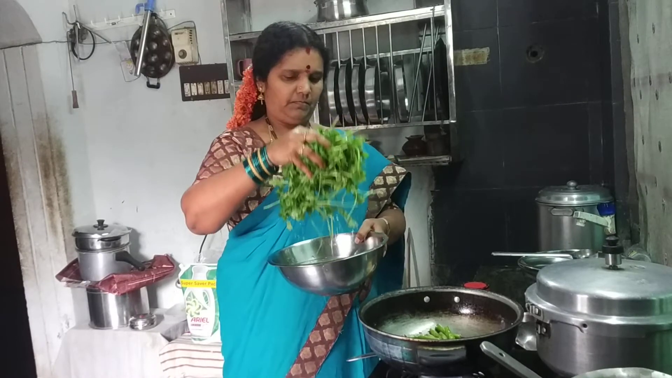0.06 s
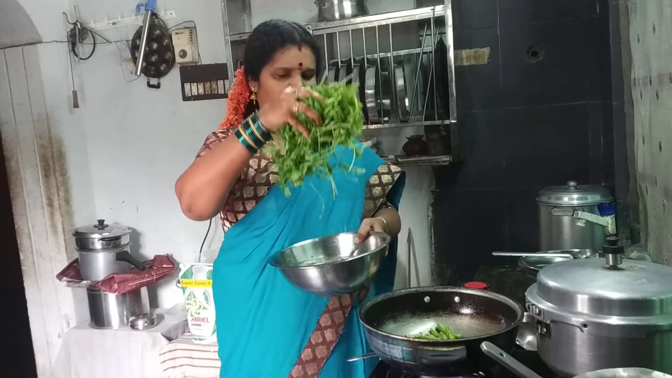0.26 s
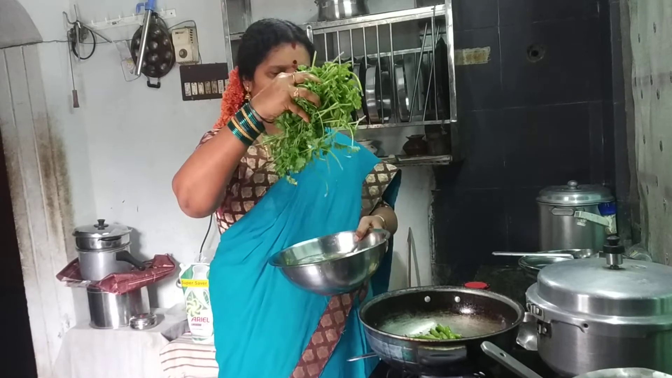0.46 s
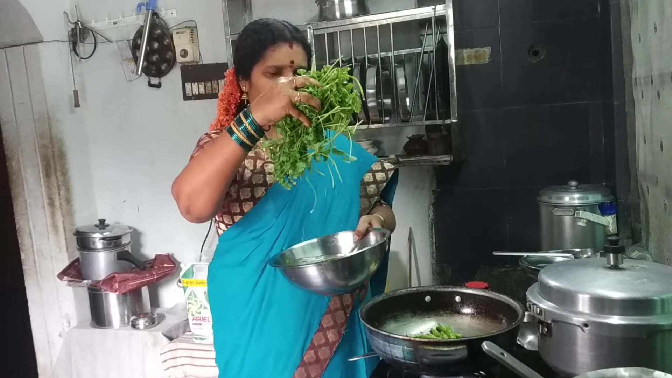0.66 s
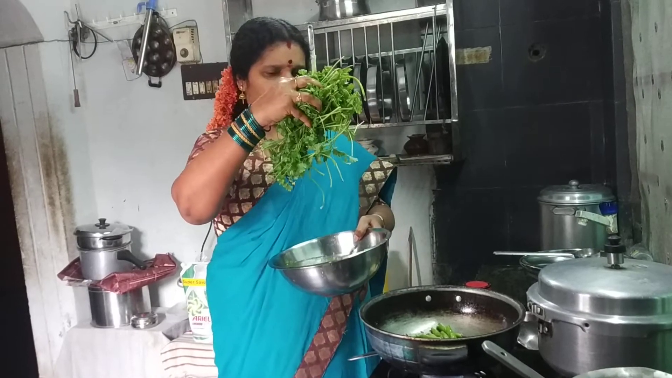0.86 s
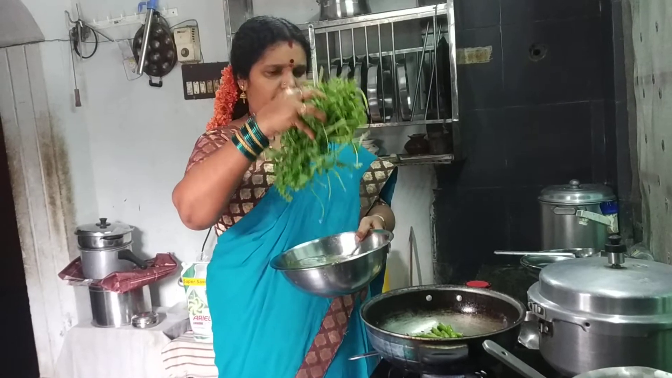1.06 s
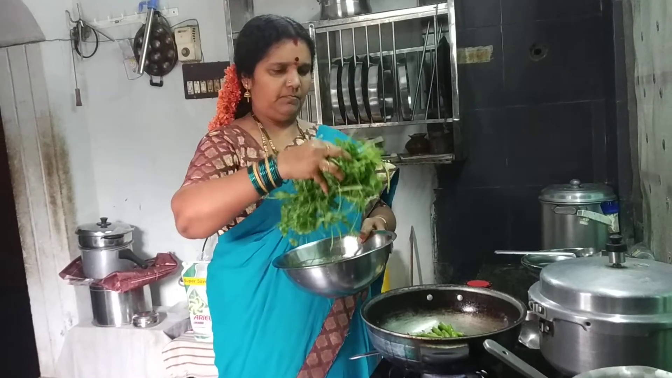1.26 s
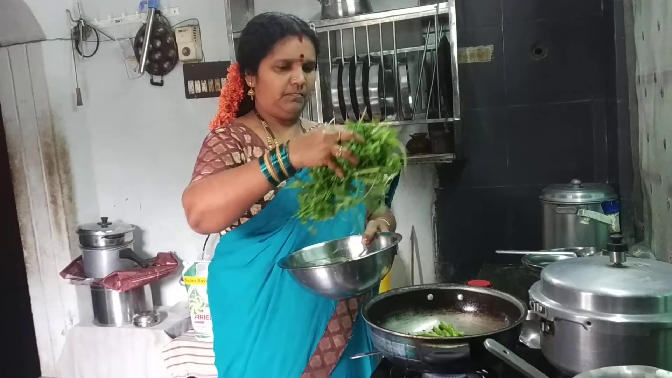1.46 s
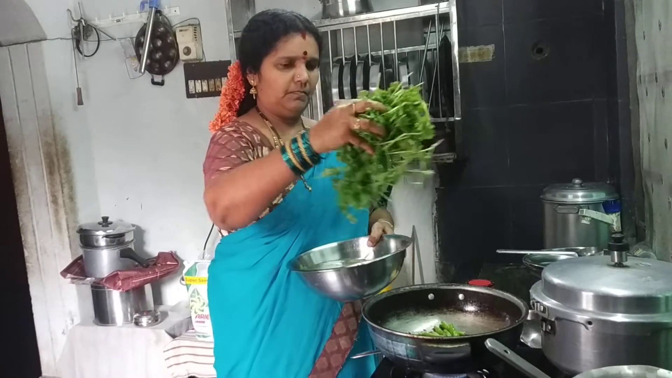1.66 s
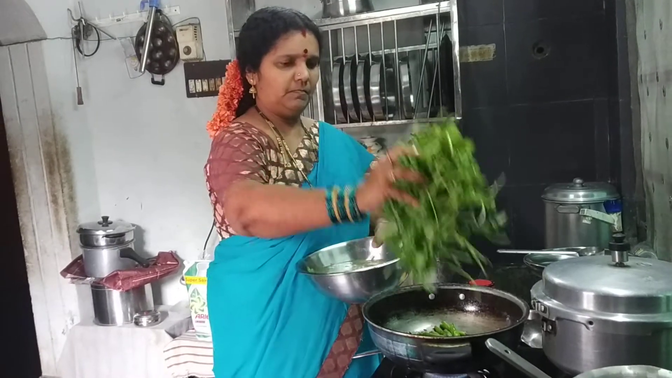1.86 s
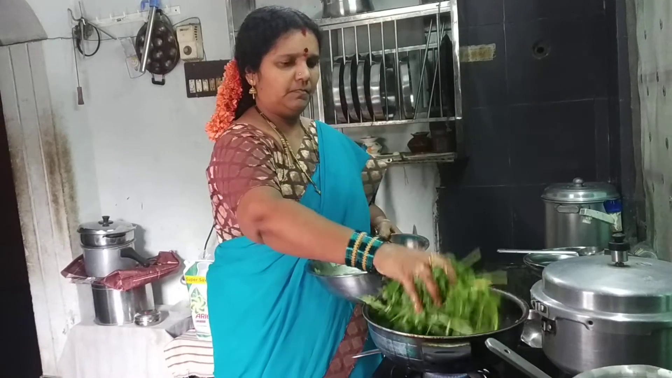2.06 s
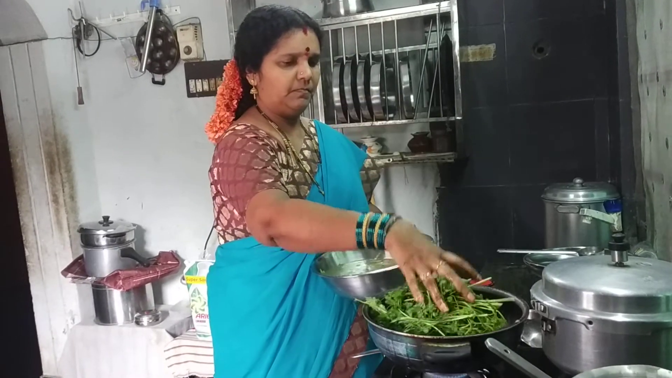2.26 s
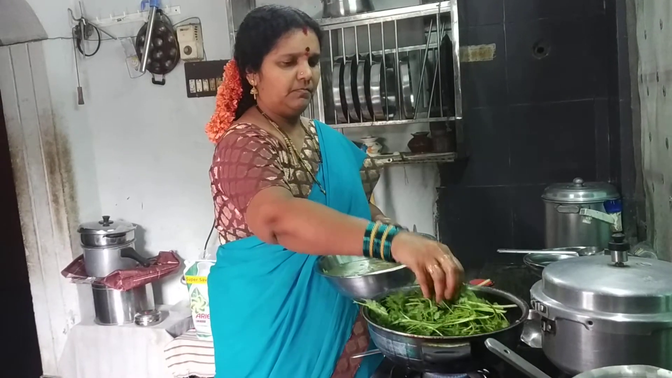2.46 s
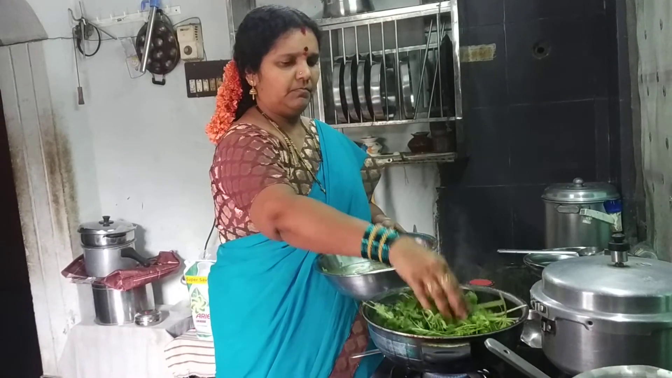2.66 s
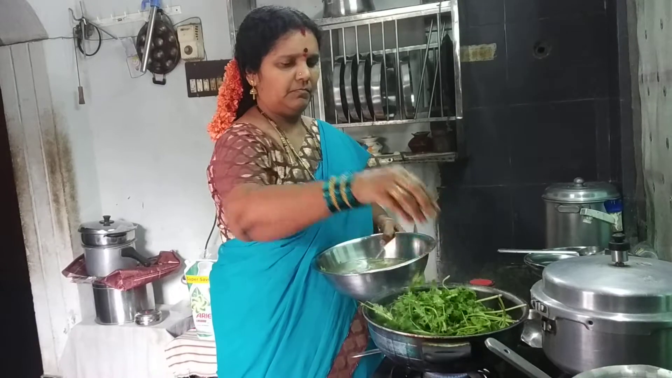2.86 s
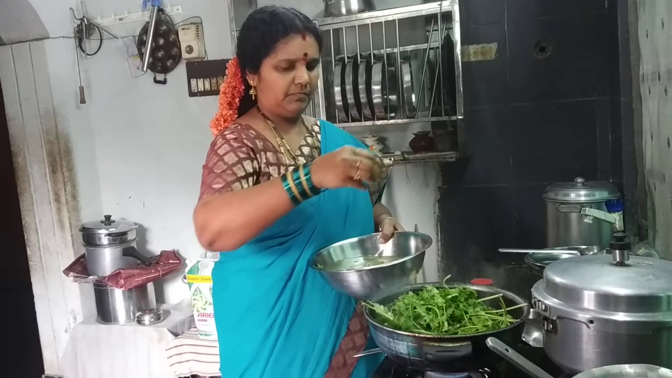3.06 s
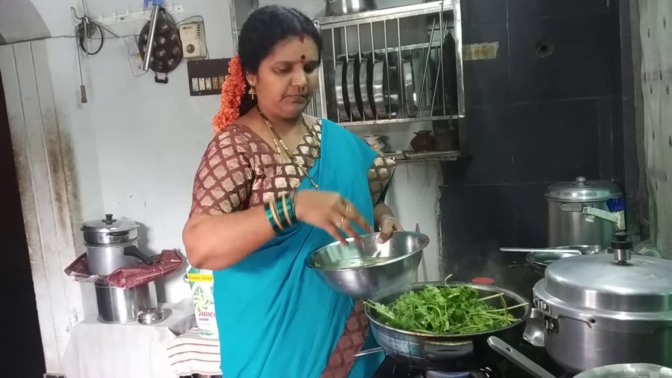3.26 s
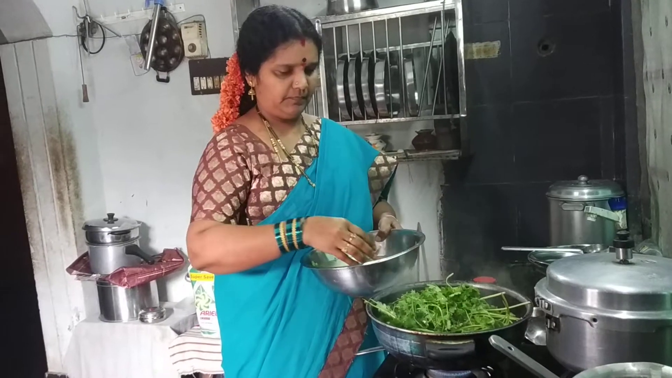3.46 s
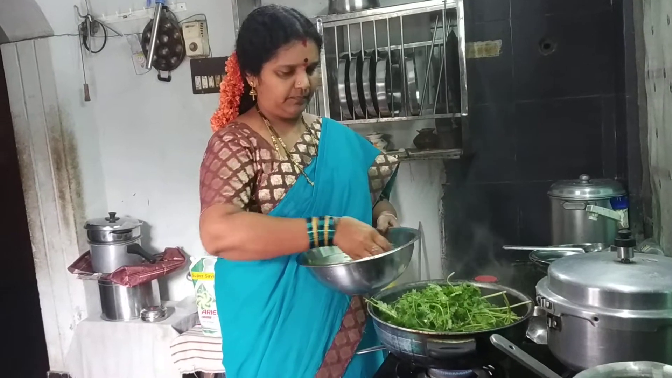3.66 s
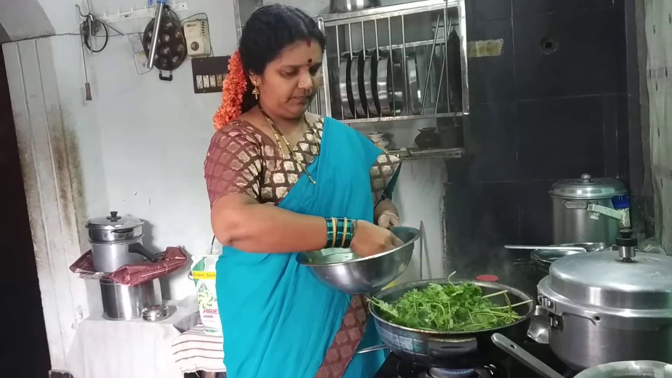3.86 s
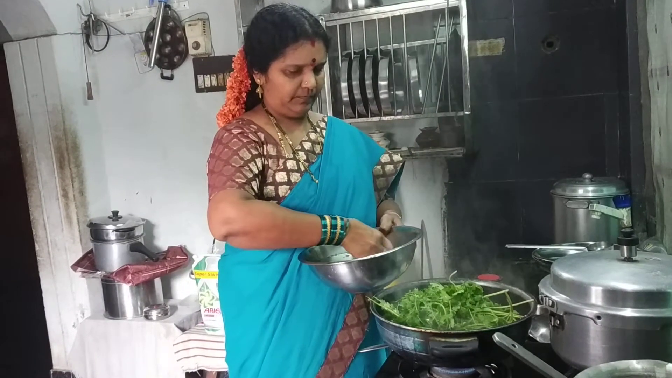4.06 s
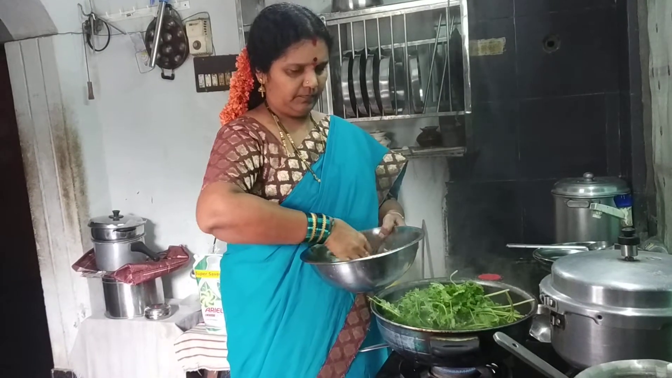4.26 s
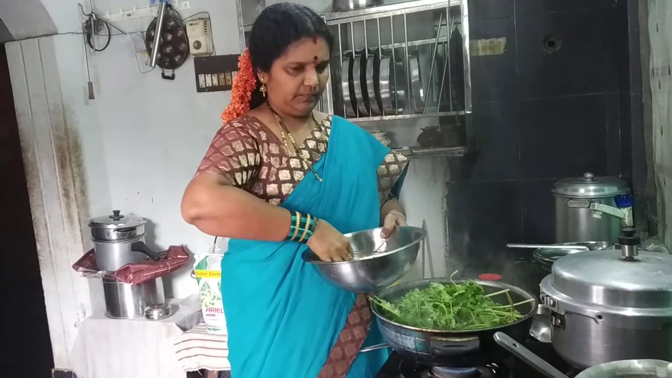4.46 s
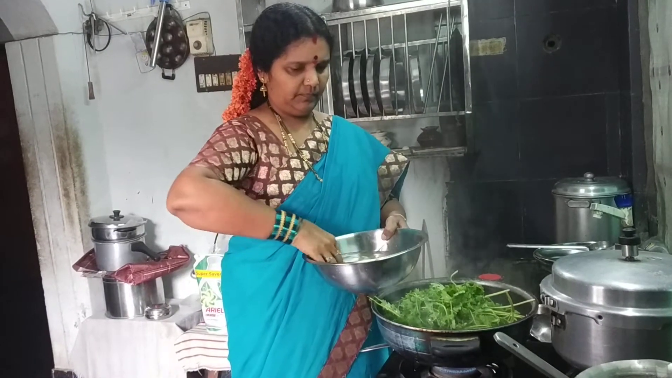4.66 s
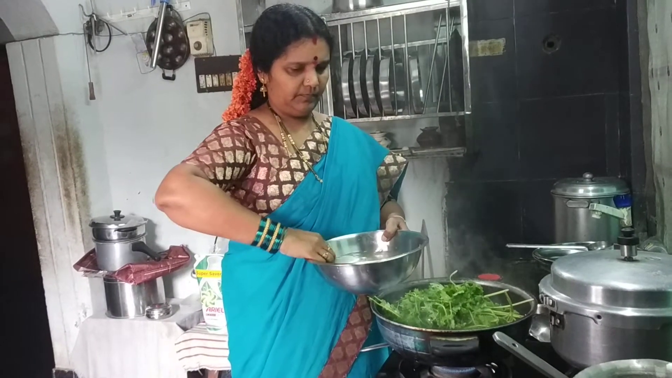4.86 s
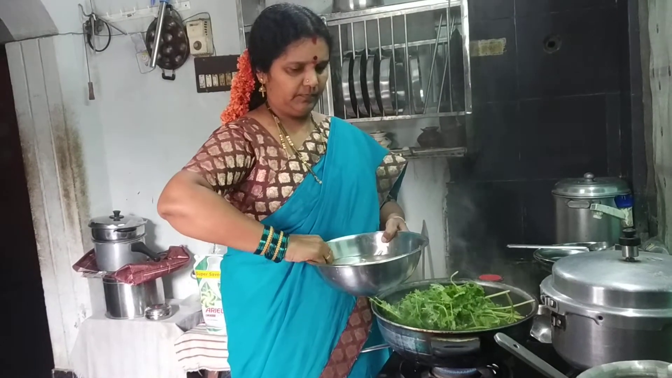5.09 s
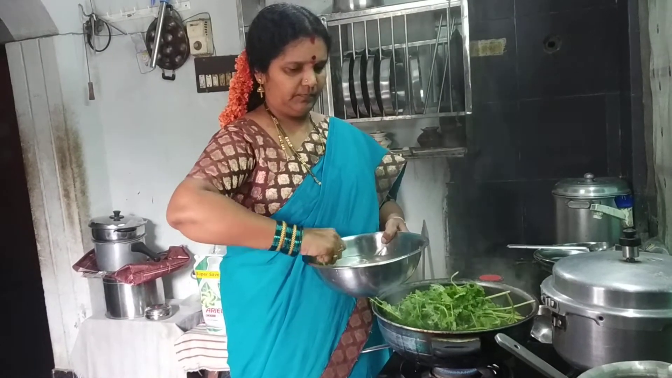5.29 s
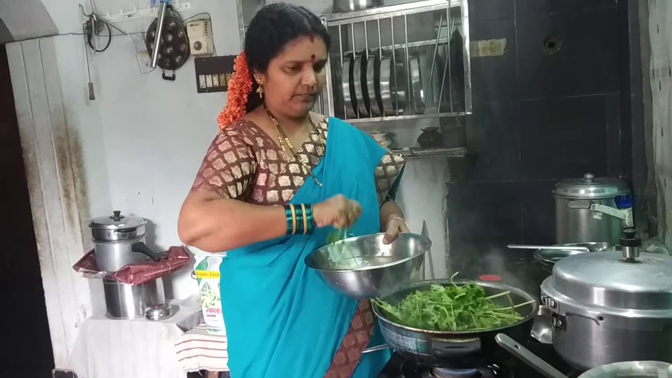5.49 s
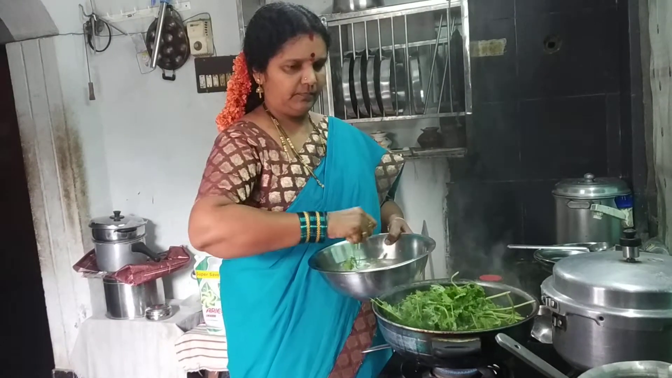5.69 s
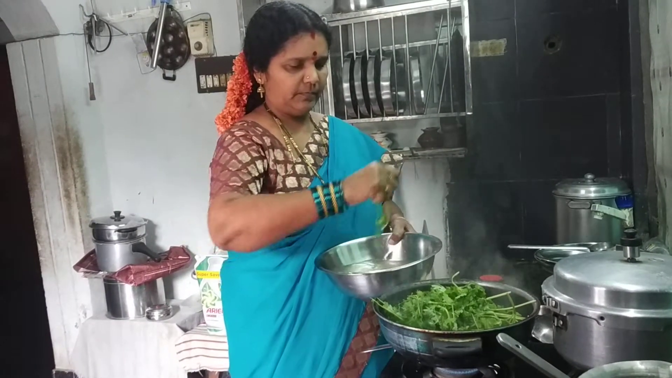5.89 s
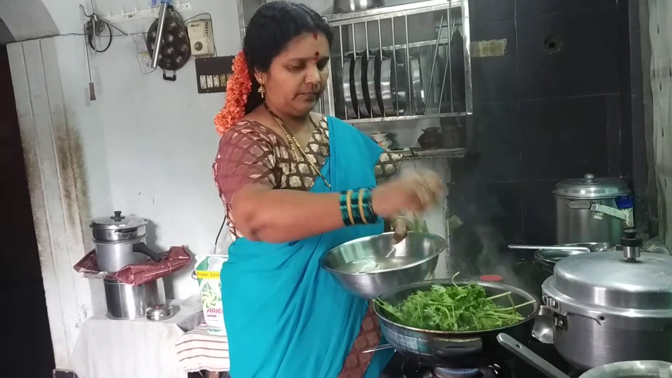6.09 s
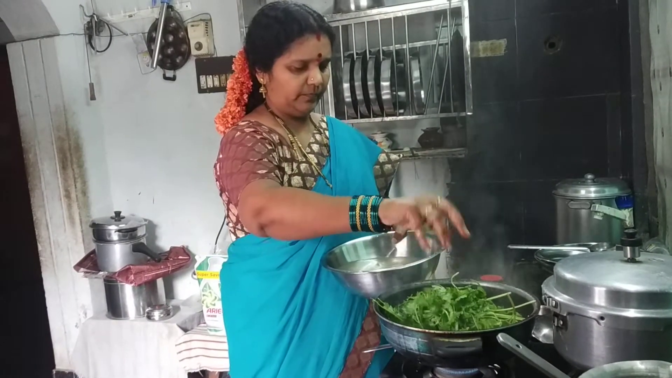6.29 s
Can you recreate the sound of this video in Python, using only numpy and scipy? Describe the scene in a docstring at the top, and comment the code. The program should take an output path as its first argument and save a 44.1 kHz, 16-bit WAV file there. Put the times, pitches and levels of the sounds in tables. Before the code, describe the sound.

A close stereo pickup in a small, hard kitchen with very short reflections. From 0 to 1.8 s hot oil sizzles fairly quietly, a fine bright hiss of countless tiny bursts over a faint low gas flame rumble. Water drips make brief flares of fizz at 0, 0.3, 0.4 to 1.0, 1.2, 1.4 and 1.6 to 1.8 s; sharp spits tick at about 0.25, 0.3, 0.55, 1.0, 1.3 and 1.65 s, stronger on the right. Very soft knocks come at 0.1, 1.2 and 1.6 s. Around 1.95 s leaves swish dully, and from 2.05 s the frying surges to a dense, bright roar by about 2.4 s, with coarse sputter, low bubbling and small snaps. Level control holds it back. It slowly dries until 6.3 s, still strong, with a faint rustle buried around 5.6 s.

```python
"""Hot oil sizzles in a frying pan: thousands of tiny random bursts, coloured by the pan and a small hard kitchen.
Now and then a drop spits, a sharp filtered tick; brief flares of fizz come from water dripping off wet leaves.
A handful of leaves goes in: the sizzle swells within a third of a second to a dense, full roar, then slowly dries.
Soft knocks and a dull rustle come from handling bowl and leaves, made of low rings and swelling filtered noise.
A gas ring rumbles faintly beneath, shaped noise with a low hum, ducked by the recorder's gain control."""
import sys
import numpy as np
from scipy import signal
from scipy.fft import rfft, irfft, next_fast_len
from scipy.io import wavfile

SR = 44100
rng = np.random.default_rng(int(sys.argv[2]) if len(sys.argv) > 2 else 0)


def materialize(psi):
    """Save the field psi as 16-bit PCM at rate SR to the path in sys.argv[1].

    A 1-D psi becomes a single channel; in a 2-D psi each row is a channel.
    """
    bounded = np.clip(np.atleast_2d(psi).T, -1, 1)
    quanta = np.round(bounded * 32767).astype(np.int16)
    wavfile.write(sys.argv[1], SR, quanta)


N = 279153
TIME = np.arange(N) / SR
SIZE = next_fast_len(N + SR)   # padded so that filter tails do not wrap round
HZ = np.maximum(np.arange(SIZE // 2 + 1) * SR / SIZE, 1)

LANDING_S = 2.064   # the whole handful lies in the oil
# span over which the bursts grow denser as the leaves go in: start_s, end_s
LEAVES_SPAN = (1.8, 2.9)


def from_db(db):
    """Decibels to gain."""
    return 10 ** (np.asarray(db) / 20)


def rms_one(x):
    """Scale to unit rms."""
    return x / np.sqrt(np.mean(x ** 2) + 1e-20)


def over_hz(points):
    """Spread a short table over the frequency axis, interpolating along log pitch."""
    hz, value = np.transpose(points)
    return np.interp(np.log(HZ), np.log(hz), value)


def filtered(x, response):
    """Pass a signal through a frequency response."""
    return irfft(rfft(x, SIZE) * response, SIZE)[..., :N]


def unit_in_band(response, low, high):
    """Scale a response so that unit white noise leaves it with rms 1 between two frequencies."""
    band = (HZ > low) & (HZ < high)
    return response / np.sqrt(np.mean(np.abs(response) ** 2 * band))


def drift(rate_hz, step=40):
    """Slow random wander with spread 1: noise through two equal low-pass poles, drawn on a coarse time grid."""
    pole = np.exp(-2 * np.pi * rate_hz * step / SR)
    count = N // step + 2
    noise = rng.standard_normal(2 * count)
    slow = signal.lfilter([1], [1, -2 * pole, pole * pole], noise)[count:]   # drop the run-in
    return np.interp(np.arange(N) / step, np.arange(count), rms_one(slow))


def tick(start_s, level_db, pitch_hz, width_hz):
    """One short ring: an impulse through a resonance around a centre frequency."""
    click = from_db(level_db) * signal.unit_impulse(N, round(start_s * SR))
    ring = 1 / (1 + 2j * (HZ - pitch_hz) / width_hz) ** 2
    return filtered(click, unit_in_band(ring, 0, SR))


def frying(fizz_db=2.0, sputter_db=2.0, bubbling_db=-2.0, seethe_db=0.36, seethe_hz=26):
    """Fine fizz above, coarser sputter below, low bubbling underneath; wet leaves multiply the bursts."""
    # burst rate of the fizz, which sputter and bubbling take a share of: bare oil [per s], with leaves [per s]
    burst_rates = (6000, 20000)
    # steam bubbles against the fizz, before the layer trims above: time_s, sputter_db, bubbling_db
    steam_levels = [(0, -23.5, -24.5), (.35, -22, -25.5), (1.55, -23.5, -24), (1.82, -23.5, -25),
                    (2.0, -22.5, -25), (2.3, -18, -19.3), (2.55, -19, -21), (2.8, -20, -22),
                    (3.6, -19, -23.5), (4.8, -20, -22), (5.35, -19, -21), (6.3, -21, -22)]
    time_s, sputter_curve, bubbling_curve = np.transpose(steam_levels)
    per_s = np.interp(TIME, LEAVES_SPAN, burst_rates)

    # split the sizzle colour into three bands
    sputter_edge_hz, bubbling_edge_hz = 5100, 1120
    colour = sizzle_colour()
    coarse = 1 / (1 + (HZ / sputter_edge_hz) ** 6)
    deep = 1 / (1 + (HZ / bubbling_edge_hz) ** 8)
    high = unit_in_band(colour * np.sqrt(1 - coarse), 4500, 15000)
    middle = unit_in_band(colour * np.sqrt(coarse * (1 - deep)), 500, 2500)
    low = unit_in_band(colour * np.sqrt(deep), 400, 1200)

    fizz = bursts(per_s, spread_db=-0.1, surge_db=2.5, low_hz=4160, high_hz=15100, octaves=0.33, count=20)
    fizz = fizz + from_db(-18) * crackle()
    sputter = bursts(per_s * .45, spread_db=1.4, surge_db=2.6, low_hz=1106, high_hz=5380, octaves=0.17, count=16)
    bubbling = bursts(per_s * .25, spread_db=2.0, surge_db=2.0, low_hz=490, high_hz=940, octaves=0.8, count=8)

    sputter_gain = from_db(sputter_db + np.interp(TIME, time_s, sputter_curve))
    bubbling_gain = from_db(bubbling_db + np.interp(TIME, time_s, bubbling_curve))
    steam = sputter_gain * filtered(sputter, middle) + bubbling_gain * filtered(bubbling, low)
    steam_gain = from_db(fizz_level(-1.5))   # a drip raises the coarse bubbles less than the fizz
    layers = from_db(fizz_db + fizz_level(0)) * filtered(fizz, high) + steam_gain * steam
    return from_db(seethe_db * drift(seethe_hz)) * layers


def bursts(per_s, spread_db, surge_db, low_hz, high_hz, octaves, count):
    """Droplets explode at random spots, each with its own pitch and surges; the tiniest merge into hiss; rms 1."""
    # power share of bursts too small to tell apart: bare oil [0-1], with leaves [0-1]
    merged_share = (0.059, 0.28)
    sizes = from_db(spread_db * np.minimum(rng.exponential(1, N), 4.5)) * rng.choice([-1, 1], N)
    chance = np.clip(per_s / SR, 1e-4, 1)
    clicks = sizes * (rng.random(N) < chance) / np.sqrt(chance)   # denser bursts keep the same power
    spots = rng.integers(0, count, N)

    pitches = np.geomspace(low_hz, high_hz, count)[:, None]
    away = (np.log2(HZ) - np.log2(pitches)) / octaves
    shares = 1 / (1 + np.square(away ** 2))
    shares = shares / shares.sum(axis=0)   # together the spots cover all pitches evenly

    heard = 0
    for spot, share in enumerate(shares):
        own = clicks * (spots == spot) * from_db(surge_db * drift(16.7))
        room = kitchen(direct_db=-5.0, early_db=-4.5, early_t60=0.032)
        heard = heard + rfft(own, SIZE) * np.sqrt(share) * room
    separate = rms_one(irfft(heard, SIZE)[:, :N])
    hiss = rng.standard_normal((2, N))
    merged = np.clip(np.interp(TIME, LEAVES_SPAN, merged_share), 0, 1)
    return np.sqrt(1 - merged) * separate + np.sqrt(merged) * hiss


def crackle(per_s=30, spread_db=4.0):
    """Sparse, sharp little snaps of water trapped under the leaves; rms 1."""
    born = (rng.random(N) < per_s / SR) & (TIME > LANDING_S)
    clicks = born * from_db(spread_db * np.minimum(rng.exponential(1, N), 2.5))
    return rms_one(filtered(clicks, kitchen(direct_db=-6.5, early_db=0.5, early_t60=0.028)))


def sizzle_colour():
    """Bright bursts, with the narrow resonances of the pan and its corner standing out low down."""
    # colour of bursting droplets: pitch_hz, density_db (relative, per Hz)
    droplet_colour = [(250, -30.5), (410, -34), (480, -26), (600, -20.5), (850, -20.5), (1300, -20),
                      (1650, -19.5), (2200, -15), (2750, -15.3), (3200, -11.5), (3900, -11), (5000, -6.5),
                      (6300, 2), (7600, 1), (9000, 4), (10200, 2), (11500, 4), (12800, 1.5), (14000, -3),
                      (15300, -7)]
    # resonances of the pan and its corner: pitch_hz, width_hz, height_db (over the hiss)
    resonances = [(196, 16, 4), (369, 9, 10), (495, 14, 2), (587, 18, 3), (635, 25, 6.5), (728, 18, 7),
                  (802, 27, 7), (951, 20, 4.5), (1025, 18, 3), (1130, 40, 0), (1178, 26, 5), (1265, 25, 0),
                  (1561, 24, 2), (1630, 22, 0), (1720, 45, 1), (1971, 36, -1), (2388, 38, 0),
                  (2734, 30, -1.5), (2950, 280, -4.5), (3532, 170, -2.5), (4098, 80, -4), (4307, 80, -5)]
    rings = sum(from_db(db) ** 2 / (1 + (2 * (HZ - hz) / width) ** 2) for hz, width, db in resonances)
    low_cut = 1 / np.sqrt(1 + (190 / HZ) ** 4)
    return from_db(over_hz(droplet_colour)) * np.sqrt(1 + rings) * low_cut


def fizz_level(flare_db):
    """Steady oil, a short flare per drip, and the leaves' fast swell and slow drying add up in power; dB."""
    # water drips off the wet leaves and the oil flares up: start_s, length_s, level_db (before flare_db)
    drips = [(0.0, 0.083, -25), (0.285, 0.056, -26.5), (0.435, 0.068, -31), (0.573, 0.077, -30.5),
             (0.66, 0.33, -31.5), (1.185, 0.021, -28.5), (1.36, 0.045, -26), (1.58, .12, -32),
             (1.695, 0.085, -28)]
    oil_db, leaves_db = -27, -6.5
    attack_s, release_s = 0.00084, 0.047
    swell_db_per_s, drying_db_per_s = 78.5, 2.05   # more leaves touch the oil, then their water boils off
    power = from_db(oil_db) ** 2
    for start_s, length_s, level_db in drips:
        attack = np.clip((TIME - start_s) / attack_s, 0, 1)
        release = np.exp(-np.maximum(TIME - start_s - length_s, 0) / release_s)
        power = power + (from_db(level_db + flare_db) * attack * release) ** 2
    since = TIME - LANDING_S
    leaves = from_db(leaves_db + np.minimum(swell_db_per_s * since, -drying_db_per_s * since))
    return 10 * np.log10(power + leaves ** 2)


def spits(gain_db=19, width_hz=3000, right_db=10.5):
    """A larger drop bursts with one sharp tick that the pan and room prolong, stronger on the right."""
    # drops that spit: start_s, level_db (before gain_db), pitch_hz
    spitting_drops = [(0.243, -27, 8300), (0.297, -23, 8150), (0.564, -26, 8890), (0.9906, -19.5, 9400),
                      (1.257, -25, 11000), (1.311, -31, 7840), (1.666, -30, 8500)]
    ticks = sum(tick(start_s, db + gain_db, hz, width_hz) for start_s, db, hz in spitting_drops)
    heard = filtered(ticks, kitchen(direct_db=-16, early_db=-3, early_t60=.025))
    return heard * from_db([[-right_db], [right_db]])   # left lowered, right raised


def handling(gain_db=25):
    """Dull, faint knocks: short low and middle rings sent through the room."""
    # soft knocks as the bowl and leaves are handled: start_s, level_db (before gain_db), pitch_hz, width_hz
    soft_knocks = [(0.111, -36, 79, 9), (1.172, -45, 720, 380), (1.583, -40, 920, 1700)]
    knocks = sum(tick(start_s, db + gain_db, hz, width) for start_s, db, hz, width in soft_knocks)
    return filtered(knocks, kitchen(direct_db=-3, early_db=-27))


def rustling(pitch_hz=200, width_hz=520):
    """Soft, low swish of the moving leaves: band-shaped noise under bell-shaped swells."""
    # leaves land in the pan and are gathered from the bowl: centre_s, half_length_s, level_db
    swishes = [(1.953, .06, -51), (5.65, 0.34, -52)]
    swell = sum(from_db(db) * np.exp(-.5 * ((TIME - s) / half) ** 2) for s, half, db in swishes)
    band = 1 / (1 + 2j * (HZ - pitch_hz) / width_hz) ** 2
    return swell * rms_one(filtered(rng.standard_normal((2, N)), band))


def burner(rumble_db=-46, waver_rad=0.19):
    """Steady turbulent rumble of the gas flame as shaped noise, with a faint hum that wavers in phase."""
    # colour of the burner: pitch_hz, density_db (relative, per Hz)
    flame_colour = [(15, -3), (32, 1.5), (50, 5.5), (62, -5), (78, -1.5), (115, 0.5), (145, -8.5),
                    (195, -6), (235, -16), (300, -10.5), (430, -22.5), (900, -26)]
    # faint low hum: pitch_hz, level_db
    hum_tones = [(49, -72), (76.5, -60.5)]
    rumble = rms_one(filtered(rng.standard_normal((2, N)), from_db(over_hz(flame_colour))))
    hum = sum(from_db(db) * np.sin(2 * np.pi * hz * TIME + waver_rad * drift(3.3)) for hz, db in hum_tones)
    return from_db(rumble_db) * rumble + hum


def kitchen(direct_db, early_db, early_t60=0.037, room_t60=0.15):
    """Response from a spot to two ports: straight path, quick reflections off pan and pots, room tail (T60 in s)."""
    t = TIME[:SR // 2]
    paths = 0
    for t60, db in ((early_t60, early_db), (room_t60, 0)):
        echoes = rng.standard_normal((2, len(t))) * from_db(-60 * t / t60)
        paths = paths + from_db(db) * echoes / np.linalg.norm(echoes, axis=1, keepdims=True)
    paths[[0, 1], rng.integers(0, 20, 2)] += from_db(direct_db)   # arrives within 20 samples at each port
    paths = paths / np.linalg.norm(paths, axis=1, keepdims=True)
    return rfft(paths.astype(np.float32), SIZE)


def microphone(pair):
    """Long waves reach both ports alike, short ones do not; each port has its own colour and delay."""
    # level between the ports: pitch_hz, left_minus_right_db
    balance = [(400, -0.5), (700, -3), (1000, -2.5), (1350, 2.5), (2000, 0), (3000, 0.5), (4500, 2.3),
               (5600, 2), (6300, 3), (7300, -1.5), (8800, -6.5), (10300, 0.5), (12500, 4), (14500, 0.5)]
    # how alike the ports hear: pitch_hz, likeness (-1 to 1, clipped just inside)
    likeness = [(30, 0.81), (100, 1), (350, 1), (600, 0.77), (780, 0.64), (1000, 0.15), (1300, 0.16),
                (2300, 0.25), (2750, 0.25), (3000, 0.59), (3220, -1.01), (3430, -0.46), (3620, 0.34),
                (3900, -0.052), (15000, 0.018)]
    # phase by which the left leads: pitch_hz, lead_rad
    left_leads = [(350, 0), (600, -0.35), (780, 1.2), (950, 0.76), (1100, -2), (1300, 0.6), (1600, -0.8),
                  (2000, -0.1)]
    alike = np.clip(over_hz(likeness), -.99, .99)
    mid = filtered(pair[0] + pair[1], np.sqrt(1 + alike)) / 2
    side = filtered(pair[0] - pair[1], np.sqrt(1 - alike)) / 2
    halves = np.array([[.5], [-.5]])   # each port takes half the difference
    ears = from_db(over_hz(balance) * halves)
    ears = ears / np.sqrt(np.mean(ears ** 2, axis=0))
    delays = np.exp(1j * over_hz(left_leads) * halves)
    return filtered(np.array([mid + side, mid - side]), delays * ears)


def gain_control(x, limit_db=-11, window_s=0.026, lookahead_s=0.023, release_db_per_s=16):
    """Turns everything down just before the level passes the limit, and recovers slowly."""
    keep = np.exp(-1 / (window_s * SR))
    power = signal.lfilter([1 - keep], [1, -keep], np.mean(x ** 2, axis=0))
    coming = np.interp(TIME + lookahead_s, TIME, power)
    over_db = np.maximum(10 * np.log10(coming + 1e-18) - limit_db, 0)
    recovery_db = release_db_per_s * TIME
    # the highest excess so far, sinking at the release rate
    reduction_db = np.maximum.accumulate(over_db + recovery_db) - recovery_db
    return x * from_db(-reduction_db)


def scene():
    """Pan, leaves, bowl and burner together at the microphone."""
    return microphone(frying() + spits() + handling() + burner() + rustling())


def record(dry):
    """Gain control holds the loud sizzle and ducks the burner; full scale clips peaks; the top is cut steeply."""
    cutoff_hz = 15750
    steep_cut = 1 / np.sqrt(1 + (HZ / cutoff_hz) ** 400)
    return filtered(np.clip(gain_control(dry), -1, 1), steep_cut)


dry = scene()
out = record(dry)
materialize(out)
```